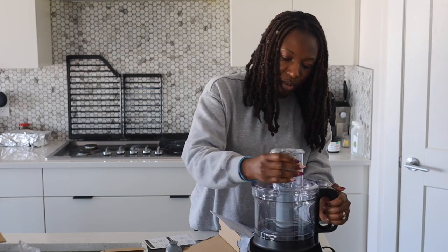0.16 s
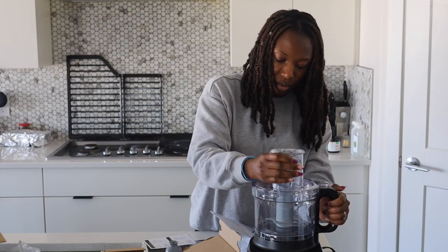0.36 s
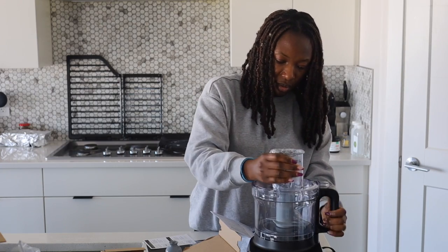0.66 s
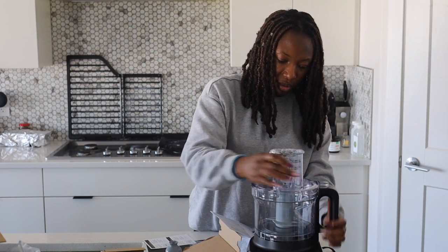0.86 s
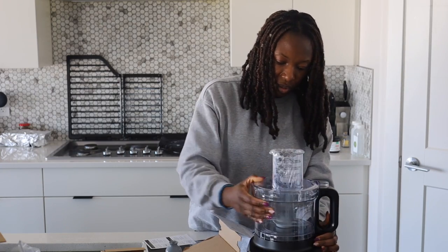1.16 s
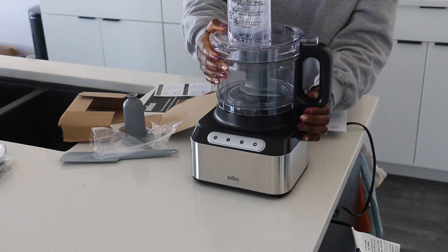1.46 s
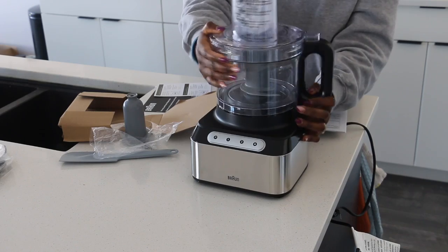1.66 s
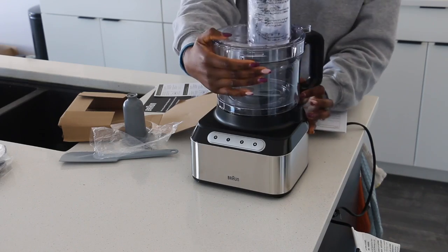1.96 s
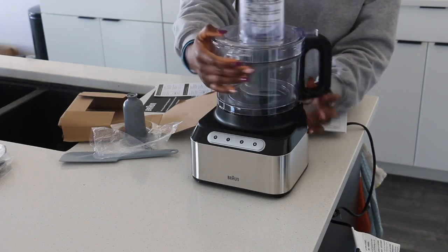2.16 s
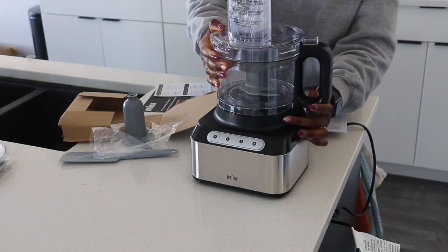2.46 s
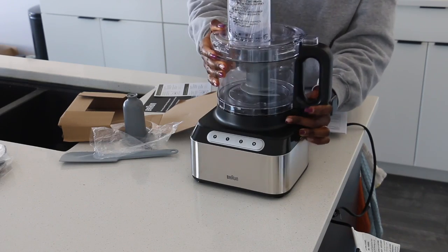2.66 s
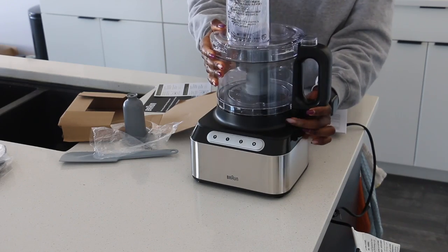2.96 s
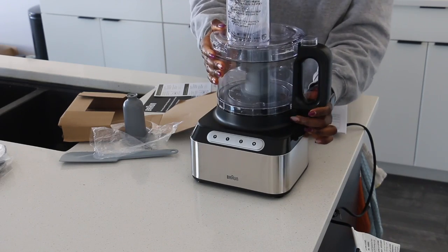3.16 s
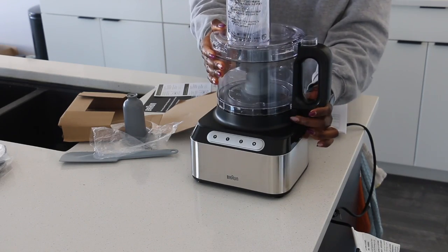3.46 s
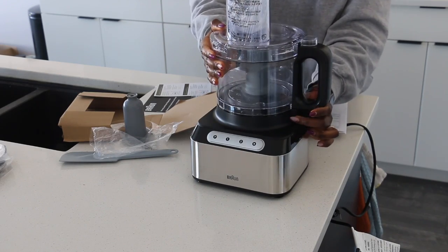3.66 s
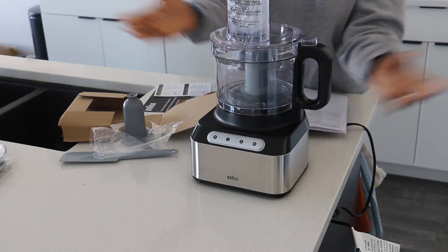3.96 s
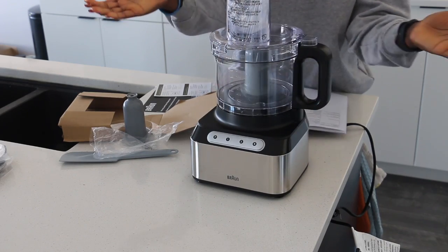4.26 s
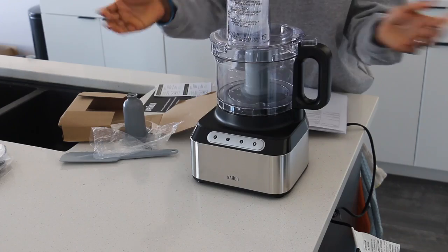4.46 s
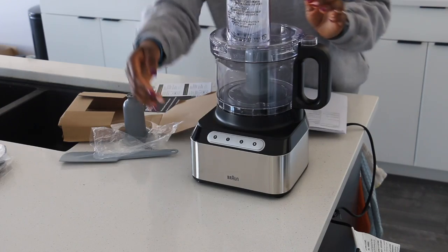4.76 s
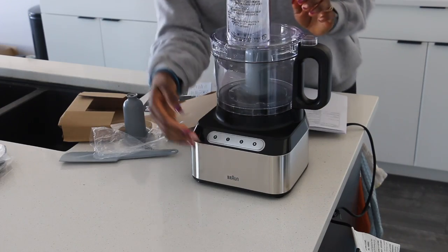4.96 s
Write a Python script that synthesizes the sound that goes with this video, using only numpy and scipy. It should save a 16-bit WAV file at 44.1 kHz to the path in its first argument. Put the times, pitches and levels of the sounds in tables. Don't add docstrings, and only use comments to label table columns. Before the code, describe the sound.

Hands twist a plastic bowl and lid onto a food processor: two hard clacks at once, the second harshly overloaded, then rubbing, small ticks and a bright clack. Just before three seconds a final click starts the motor, which rises quickly into a loud empty roar and whine. Close stereo microphone, hard reflective kitchen, faint refrigerator hum.

```python
import sys
import numpy as np
from scipy import signal
from scipy.fft import rfft, irfft, next_fast_len
from scipy.io import wavfile
from scipy.ndimage import map_coordinates

SR = 44100
rng = np.random.default_rng(int(sys.argv[2]) if len(sys.argv) > 2 else 0)


def linear_from_db(decibels):
    return 10 ** (np.asarray(decibels, float) / 20)


def store_wav(level_fs):
    pcm = np.round(np.clip(np.atleast_2d(level_fs), -1, 1) * 32767)
    wavfile.write(sys.argv[1], SR, pcm.T.astype(np.int16))


N = 225554
SIZE = next_fast_len(N + SR)
HZ = np.maximum(np.arange(SIZE // 2 + 1) * SR / SIZE, 1)
TIME = np.arange(N) / SR

SPOTS = 5
SWITCH_S = 2.74
CRUISE_HZ = 3500

# centre [Hz], width [Hz], lift [dB].
HOUSING = [(306, 22, 6), (460, 25, 6), (625, 18, 3.5), (820, 18, 5), (930, 30, 6), (1113, 40, 3),
           (1455, 24, 5), (1590, 25, 4), (1850, 40, 5), (2132, 30, 4), (2281, 20, 9), (2450, 40, 6),
           (2639, 18, 8), (2930, 80, 2), (3105, 22, 8), (3325, 28, 6)]


def rms_one(x):
    return x / np.sqrt(np.mean(x ** 2) + 1e-20)


def at_hz(points, hz):
    table = np.array(points)
    return np.interp(np.log(hz), np.log(table[:, 0]), table[:, 1])


def drift(rate):
    knots = rng.standard_normal(2000)
    return map_coordinates(knots, [TIME * rate], order=3)


def resonate(x, hz, width_hz):
    r = np.exp(-np.pi * width_hz / SR)
    zeros = np.array([1, 0, -1]) * (1 - r * r) / 2
    poles = [1, -2 * r * np.cos(2 * np.pi * hz / SR), r * r]
    return signal.lfilter(zeros, poles, x + 1e-18)


def peak(hz, width_hz):
    return 1 / (1 + (2 * (HZ - hz) / width_hz) ** 2)


def spread(mid, side):
    # frequency [Hz], side minus mid [dB].
    width = [(30, -26), (60, -22), (125, -28), (250, -26), (500, -14), (1000, -11), (2000, -7.5),
             (4000, -7.8), (8000, -7.8), (11500, -4)]
    # frequency [Hz], left minus right [dB].
    lean = [(400, -.2), (1000, -1.2), (2000, -2.6), (4000, -.7), (8000, -.6), (11500, -1.5)]
    both = mid + linear_from_db(at_hz(width, HZ)) * side * [[1], [-1]]
    return both * linear_from_db(np.array([[.5], [-.5]]) * at_hz(lean, HZ))


def stereo_noise(gain):
    mid, side = rfft(rng.standard_normal((2, SIZE)))
    return rms_one(irfft(gain * spread(mid, side), SIZE)[:, :N])


def coloured(spectrum, edge_db):
    low, high = spectrum[0][0], spectrum[-1][0]
    beyond = np.maximum(np.log2(low / HZ), 0) + np.maximum(np.log2(HZ / high), 0)
    return linear_from_db(at_hz(spectrum, HZ) - edge_db * beyond)


def handling():
    # start [s], length [s], rub [dB], push [dB].
    strokes = [(0.0, 0.25, -49, -44.5), (0.47, 0.14, -50.5, -69), (0.719, 0.036, -62, -46.5),
               (0.88, 0.041, -56.5, -68), (1.077, 0.022, -68, -59), (1.17, 0.091, -62, -59),
               (1.43, 0.11, -61, -66), (1.572, .05, -69, -54), (1.697, .05, -46.5, -38),
               (1.777, 0.1, -60, -56), (1.975, 0.037, -62, -57), (2.186, .02, -64, -58),
               (2.232, 0.022, -54.5, -45), (2.287, 0.12, -60, -41), (2.477, .07, -61, -57),
               (2.59, 0.044, -59, -65)]
    # frequency [Hz], density [dB per Hz].
    rustle_colour = [(1100, 3.5), (1600, 2), (2800, -1), (4500, -10.5)]
    # frequency [Hz], density [dB per Hz].
    skin_colour = [(4000, 7), (6000, 1), (9000, -4), (11300, -3)]
    grip_s, let_go_s = 0.0078, 0.034
    skin_db, hollow_db = -7.5, -10
    rest = linear_from_db(-59.5) * (TIME < SWITCH_S)
    rub, push = 0, 0
    for s, length, rub_db, push_db in strokes:
        grip = np.clip((TIME - s) / grip_s, 0, 1)
        stroke = grip * np.exp(-np.maximum(TIME - s - length, 0) / let_go_s)
        rub = rub + linear_from_db(rub_db) * stroke
        push = push + linear_from_db(push_db) * stroke
    rustle = linear_from_db(2.0 * drift(110)) * stereo_noise(coloured(rustle_colour, edge_db=15))
    skin = linear_from_db(3.5 * drift(67)) * stereo_noise(coloured(skin_colour, edge_db=4.0))
    hollow = linear_from_db(2.0 * drift(29.3)) * stereo_noise(1 / np.hypot(1, (HZ - 820) / 150) ** 2)
    rumble = linear_from_db(2.0 * drift(29.94)) * stereo_noise(1 / np.hypot(1, (HZ - 270) / 80) ** 3)
    rubbing = (rest + rub) * (rustle + linear_from_db(skin_db) * skin)
    return rubbing + (rest + linear_from_db(hollow_db) * push) * hollow + (linear_from_db(-2) * rest + push) * rumble


def background():
    # centre [Hz], width [Hz], level [dB].
    panels = [(342, 14, -60), (451.4, 6.8, -62.5), (765, 17, -66.5)]
    # frequency [Hz], level [dB].
    hum_lines = [(60, -65), (113.4, -59), (120, -58), (226.8, -57)]
    # frequency [Hz], density [dB per Hz].
    floor = [(15, -56), (25, -3), (108, -2), (167, 0.5), (227, 11), (279, -28), (351, 5), (602, -4),
             (777, -17), (1200, -24), (4680, -16.5), (8670, -24), (11500, -55.5), (14900, -78),
             (22000, -120)]
    beat_s = .655
    hum = sum(linear_from_db(db) * peak(hz, width_hz) / np.sqrt(width_hz) for hz, width_hz, db in panels)
    lines = 0
    for hz, db in hum_lines:
        lines = lines + np.sqrt(2) * linear_from_db(db + 1.9 * drift(4.26)) * np.cos(2 * np.pi * hz * (TIME - beat_s))
    return lines + linear_from_db(-58) * stereo_noise(hum) + linear_from_db(-50.5) * stereo_noise(coloured(floor, edge_db=27.0))


def touches():
    # start [s], peak [dB], ring [Hz], thud and crack [dB re peak].
    catches = [
        (0.1336, -1.5, 2620, -7.5, -11),
        (0.2388, 8, 2800, -13.5, -42),
        (2.383, -29, 2860, -1, -4),
    ]
    # start [s], peak [dB], ring [Hz], crack [dB re
    lone_touches = [
        (.9955, -28, 1600, 0),
        (1.0, -32, 1600, -1),
        (1.6409, -10, 3000, -30),
        (1.6422, -20, 1150, -24),
        (1.6455, -14, 1550, -20),
                    (.0650, -22, 900, -12), (0.0627, -23.5, 1760, -17), (0.1116, -19, 2200, -14.5),
              (0.115, -19, 1190, -15), (0.1272, -7, 1270, -23), (0.129, -4, 3600, 2),
              (0.237, 4.5, 1660, -44), (1.15, -34.5, 2200, -6), (1.2527, -39, 1410, -16),
              (1.4457, -34.5, 2750, -2), (1.6395, -41.5, 4000, 1.5), (1.7402, -26.5, 1500, -10),
              (1.9523, -34, 2370, -16.5), (2.064, -51, 1040, 11), (2.243, -54, 1080, -14),
              (2.287, -34, 1600, 0), (2.3183, -28, 2340, -33), (2.381, -32, 3500, 2),
              (2.3867, -27, 1800, -32), (2.603, -40, 1060, -12), (2.629, -39, 1100, -26),
              (2.6457, -33.5, 1430, -25), (2.718, -31, 2400, -4.5), (2.7328, -12, 2970, -17.5),
              (2.7425, -9, 2250, -25)]
    rows = []
    for s, db, hz, thud_db, crack_db in catches:
        for k in range(4):
            rows.append((s + k * .0037, db - k * 2, hz * 0.63 ** k, thud_db - k * 0.5, crack_db))
    for s, db, hz, crack_db in lone_touches:
        thud_db = -4.5 - 21 * np.log2(hz / 1000)
        rows.append((s, db, hz, thud_db, crack_db))
    return rows


def contacts():
    # frequency [Hz], level [dB], t60 [s].
    bowl = [(330, 4, 0.078), (478, 0, 0.14), (819, 3, 0.074), (1080, -1.5, 0.026), (1460, -0.5, 0.061),
            (1677, 0, 0.085), (2080, -1, 0.0092), (2800, -2, 0.022), (3190, -4.5, 0.0085),
            (4200, -1, 0.0076)]
    out, length = np.zeros((SPOTS, 2, N)), SR // 5
    t = np.arange(length) / SR
    draws = rng.standard_normal((50, length))
    strengths = rng.normal(0, 2.5, (50, len(bowl)))
    for k, (s, peak_db, ring_hz, thud_db, crack_db) in enumerate(touches()):
        pan_db = -1.3 - 2.5 * np.log2(ring_hz / 1000)
        ticks = linear_from_db(-28) * draws[k] * np.exp(-t / 0.0039)
        ticks[0] = np.sign(draws[k, 0])
        scrape = linear_from_db(-21) * draws[k] * np.exp(-t / .002)
        crack = resonate(resonate(ticks + scrape, 5000, 3500), 5000, 5000)
        ring = resonate(resonate(ticks, ring_hz, .2 * ring_hz), ring_hz, .6 * ring_hz)
        for (hz, db, t60), chance_db in zip(bowl, strengths[k]):
            near_db = -8 * np.abs(np.log2(hz / ring_hz))
            ring = ring + linear_from_db(db + 10.0 + chance_db + near_db) * resonate(ticks, hz, 7.4 / t60)
        ring = resonate(ring, ring_hz, .55 * ring_hz)
        thud = resonate(resonate(ticks, 327, 490), 340, 886)
        ring, crack, thud = (v / np.abs(v).max() for v in (ring, crack, thud))
        pan = linear_from_db([[pan_db / 2], [-pan_db / 2]])
        hit = (ring + linear_from_db(crack_db) * crack) * pan + linear_from_db(thud_db) * thud
        at = round(s * SR)
        out[k % SPOTS, :, at:at + length] += linear_from_db(peak_db) * hit
    return out


def bar_rate():
    u = np.maximum(TIME - SWITCH_S, 0)
    kick = 1085 * np.exp(-u / .041)
    run_up = 1715 * np.exp(-u / .23)
    return CRUISE_HZ + 135 * u - kick - run_up


def roar():
    # cruise [dB], jolt [dB], loss at standstill [dB], creep [dB per s].
    layers = [
        (-22.5, -10.5, -4.5, -0.58),
        (-17.5, -5, 5, 1.23),
        (-22.5, 14, 10.5, 1.47),
        (-26.5, 19.5, 13.5, 0.6),
    ]
    # frequency [Hz], density [dB per Hz].
    growl_colour = [(320, -46), (580, -26), (720, -9.5), (860, -3), (934, 5.5), (1010, 5.5), (1350, 3.5),
                    (1760, -23), (2970, -120)]
    # frequency [Hz], density [dB per Hz].
    gear_colour = [(790, -36), (1350, -6.5), (1440, 2.5), (1740, -2), (1860, -0.5), (2030, -2.5),
                   (2210, -1), (2540, 1.5), (4200, -13), (5460, -32), (9240, -120)]
    # frequency [Hz], density [dB per Hz].
    air_colour = [(1940, 1.5), (3300, -1.5), (4150, -6.5), (5090, -4), (6110, -10.5), (7490, -10.5),
                  (9820, -18.5), (10400, -27.5), (11100, -20.5), (11500, -35), (14900, -55), (22000, -120)]
    # frequency [Hz], density [dB per Hz].
    drone_colour = [(65, -50), (110, -30), (140, -17.5), (198, -2), (246, 0.5), (308, -2), (398, -5.5),
                    (498, -6), (577, 0), (700, 3), (910, -3), (1540, -120)]
    u = np.maximum(TIME - 2.731, 0)
    attack_s, jolt_s = 0.016, 0.041
    shortfall = np.maximum(1 - bar_rate() / CRUISE_HZ, 0)
    growl_db, gears_db, air_db, drone_db = (
        db + jolt_db * np.exp(-u / jolt_s) - lost_db * shortfall + creep_db * u
        for db, jolt_db, lost_db, creep_db in layers)
    housing = linear_from_db(sum(lift_db * peak(hz, width_hz) for hz, width_hz, lift_db in HOUSING))
    chatter = drift(180)
    growl_db = growl_db + chatter + drift(11)
    gears_db = gears_db + chatter + 0.37 * drift(13)
    air_db = air_db + chatter + 0.56 * drift(18)
    drone_db = drone_db + drift(19)
    growl = linear_from_db(growl_db) * stereo_noise(housing * coloured(growl_colour, edge_db=30))
    gears = linear_from_db(gears_db) * stereo_noise(housing * coloured(gear_colour, edge_db=30))
    air = linear_from_db(air_db) * stereo_noise(coloured(air_colour, edge_db=35))
    drone = linear_from_db(drone_db) * stereo_noise(housing * coloured(drone_colour, edge_db=30))
    return np.minimum(u / attack_s, 1) * (growl + gears + air + drone)


def whine():
    # frequency [Hz], level [dB].
    bar_voice = [(700, -40), (1450, -17), (1900, -18), (2150, -20), (2600, -27), (2950, -36), (3350, -35),
                 (3700, -46)]
    # frequency [Hz], level [dB].
    octave_voice = [(4950, -46), (5200, -32), (5440, -46), (6150, -48), (6500, -27), (7300, -39),
                    (7420, -46), (7620, -38)]
    # frequency [Hz], level [dB].
    rotor_voice = [(58, -50), (130, -42), (262, -37), (300, -44)]
    commutator_bars = 12
    running = TIME > SWITCH_S
    bar_hz = bar_rate()
    bar_db = at_hz(bar_voice, bar_hz) + 4 * drift(70)
    octave_db = at_hz(octave_voice, 2 * bar_hz) + 0.37 * drift(17) + 2.0 * drift(55)
    rotor_db = at_hz(rotor_voice, bar_hz / commutator_bars) + 2.1 * drift(25)
    phase = 2 * np.pi * np.cumsum(bar_hz * (1 + 0.0021 * drift(40))) / SR
    bars = running * linear_from_db(bar_db) * np.sin(phase + .7 * drift(150))
    steps = sum(resonate(bars, hz, width_hz) for hz, width_hz, _ in HOUSING)
    octave = linear_from_db(octave_db) * np.sin(2 * phase)
    rotor = linear_from_db(rotor_db) * np.sin(phase / commutator_bars)
    return np.sqrt(2) * running * (linear_from_db(-3) * bars + linear_from_db(7) * steps + octave + rotor)


def kitchen(feeds, early_db):
    # frequency [Hz], t60 [s].
    decay = [(125, 0.63), (500, 0.5), (1500, 0.49), (4000, 0.39), (8000, 0.44), (12000, 0.17)]
    t, tail = np.arange(SR) / SR, 0
    white = rng.standard_normal((2, SPOTS, 2, SR))
    for k, low in enumerate(70 * 2. ** np.arange(0, 7.6, .5)):
        sos = signal.butter(2, [low, low * np.sqrt(2)], "band", fs=SR, output="sos")
        band = signal.sosfilt(sos, white[k % 2])
        late = linear_from_db(-60 * t / at_hz(decay, low))
        early = linear_from_db(early_db - 60 * t / 0.046)
        tail = tail + band * (late + early)
    tail = tail * np.clip(t / 0.0021 - 1, 0, 1)
    tail = tail / np.sqrt(np.sum(tail[0, 0] ** 2))
    wet = 0
    for feed, (mid, side) in zip(rfft(feeds, SIZE), rfft(tail, SIZE)):
        wet = wet + feed * spread(mid, side)
    return irfft(wet, SIZE)[:, :N]


def scene():
    hits, tones, noise = contacts(), whine(), roar()
    feeds = linear_from_db(-2.5) * hits.mean(axis=1)
    feeds[0] += linear_from_db(-3) * tones + linear_from_db(-13) * noise.mean(axis=0)
    direct = hits.sum(axis=0) + linear_from_db(-2.5) * tones * linear_from_db([[-.6], [.6]]) + noise
    return direct + kitchen(feeds, early_db=2) + handling() + background()


def low_pass(x):
    return signal.sosfilt(signal.butter(12, 11640, fs=SR, output="sos"), x)


def record(dry):
    thin = signal.sosfilt(signal.butter(2, 45, "high", fs=SR, output="sos"), dry)
    return low_pass(np.clip(thin, -1, 1))


dry = scene()
out = record(dry)
store_wav(out)
```